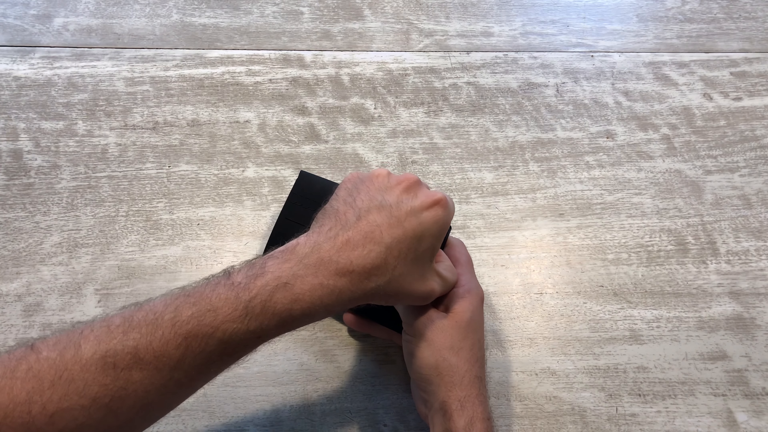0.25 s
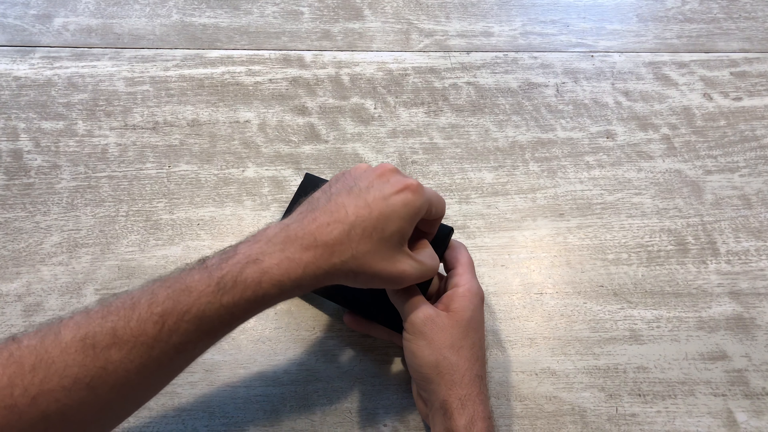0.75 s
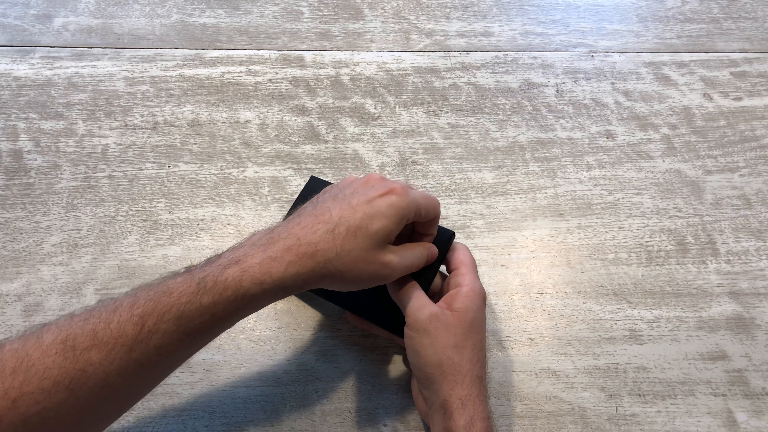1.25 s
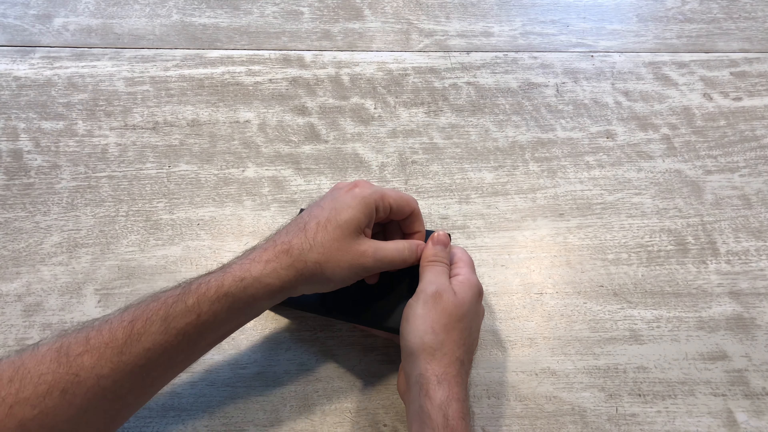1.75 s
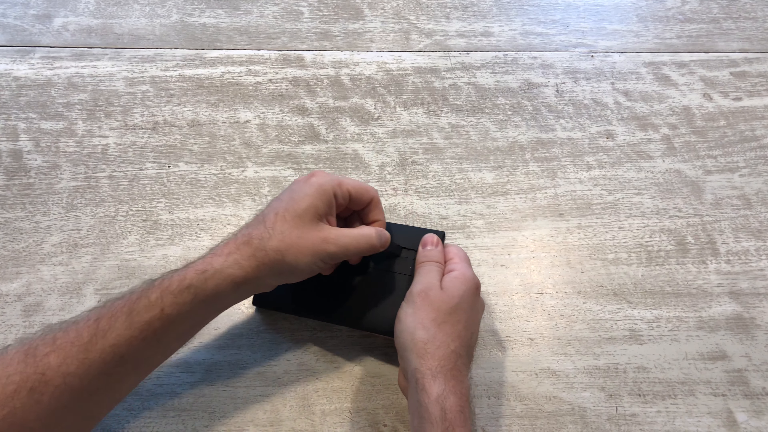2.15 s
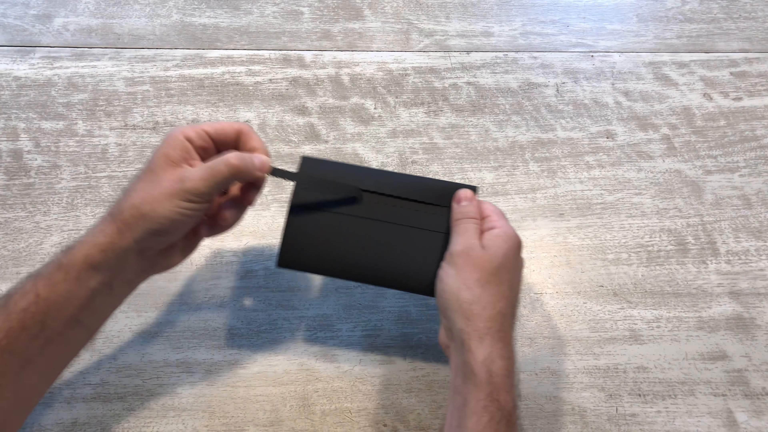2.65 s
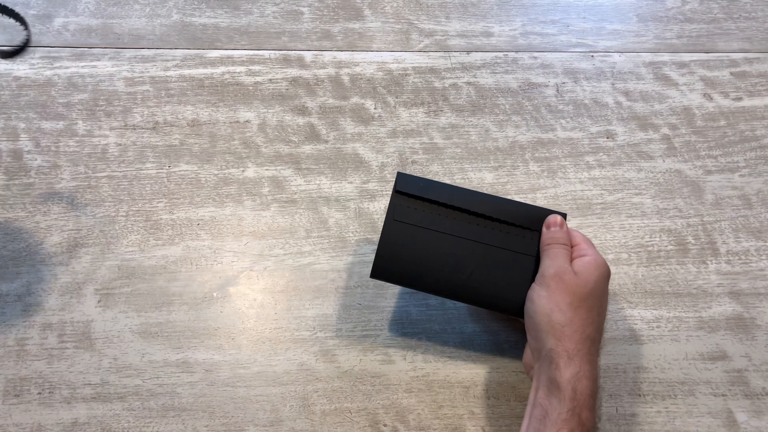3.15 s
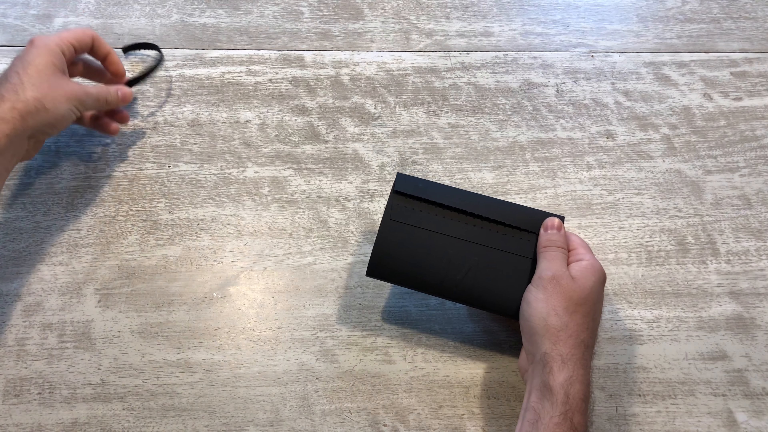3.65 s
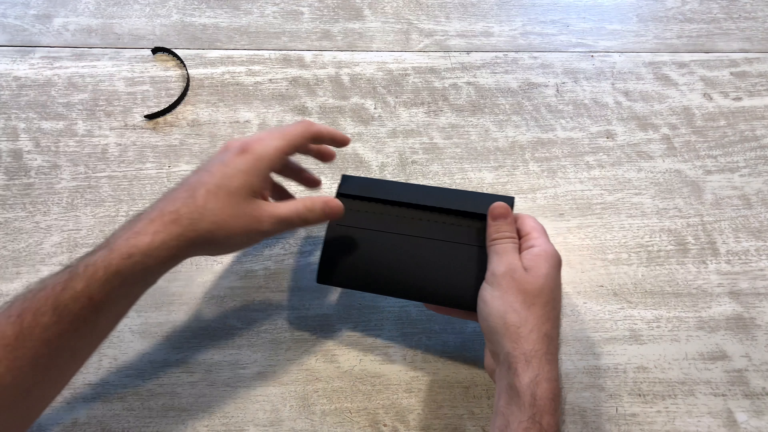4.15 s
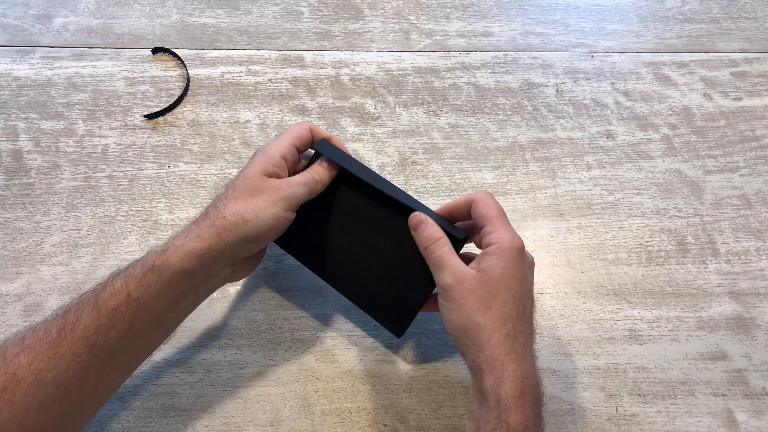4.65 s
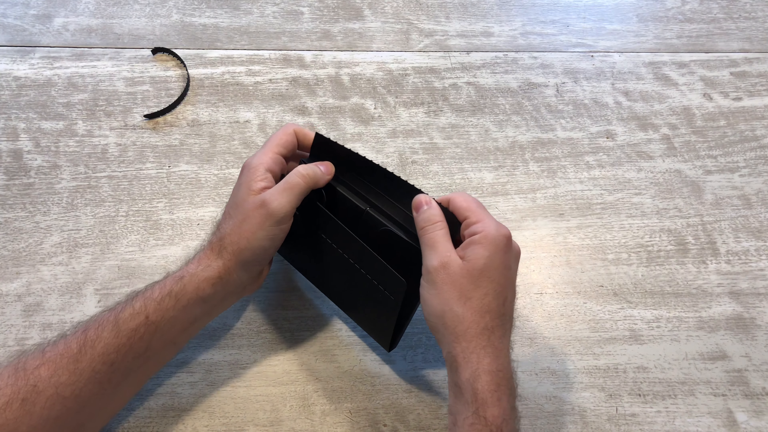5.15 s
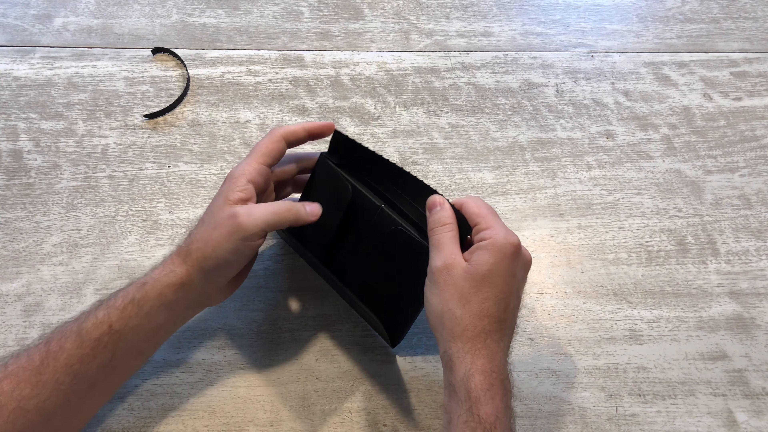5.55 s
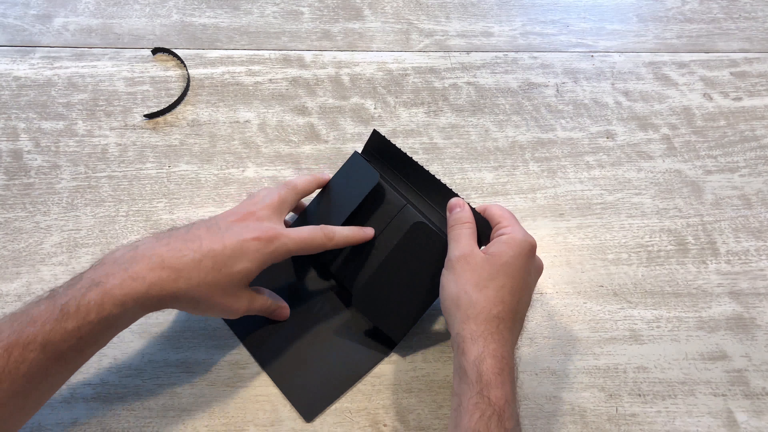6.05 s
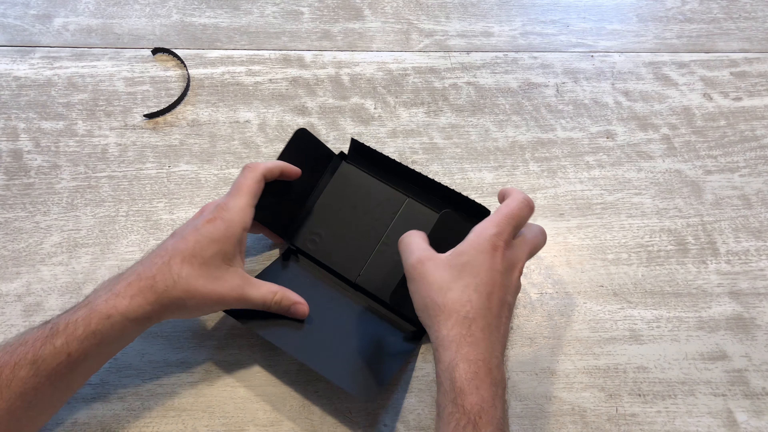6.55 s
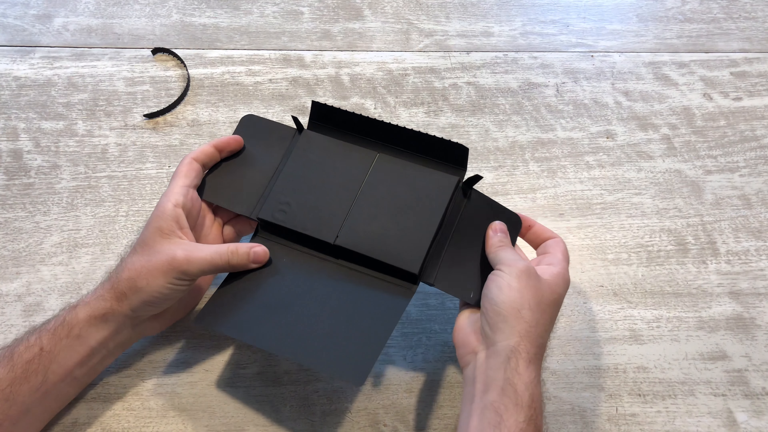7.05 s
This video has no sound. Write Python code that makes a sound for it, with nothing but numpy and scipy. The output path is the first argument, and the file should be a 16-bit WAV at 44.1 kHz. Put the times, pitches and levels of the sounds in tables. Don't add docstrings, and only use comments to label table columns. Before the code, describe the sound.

Close-up cardboard tearing: a few sharp snaps speed into a crackling rip, followed by quiet hand rustles, popping flaps and faint creaks indoors.

```python
import sys
import numpy as np
from scipy import signal
from scipy.fft import rfft, irfft
from scipy.io import wavfile
from scipy.ndimage import uniform_filter1d

SR = 44100
rng = np.random.default_rng(int(sys.argv[2]) if len(sys.argv) > 2 else 0)


def unload_wav(signal):
    wavfile.write(
        sys.argv[1],
        SR,
        np.round(np.clip(np.atleast_2d(signal).T, -1, 1) * 32767).astype(np.int16),
    )


def convert_level_to_amplitude(level_db):
    exponent = np.asarray(level_db, float) / 20
    return 10 ** exponent


N = 321577
EDGES = 22 * 2 ** np.arange(0, 9.7, .5)
TAILS = 3


def tugs():
    # (time [s], crack peak [dB], knock peak [dB], crack resonance [Hz], knock [Hz])
    bridges = [(0.7066, -25.5, -19.5, 9500, 850), (1.7574, -26, -16, 7400, 833),
               (1.7613, -29, -18, 13800, 1050), (2.1309, -27.5, -31, 10820, 770),
               (2.1376, -26, -19.5, 7220, 790), (2.1804, -21, -21.5, 5410, 760),
               (2.1873, -22.5, -20, 11120, 1150), (2.2412, -36, -27, 5190, 800),
               (2.3199, -23.5, -24, 5890, 815), (2.3309, -23, -22, 7130, 900),
               (2.3658, -25.5, -27, 5700, 830), (2.3704, -24.5, -17.5, 5167, 850),
               (2.3943, -18.5, -21.5, 6200, 860), (2.3978, -16, -17.5, 9200, 834),
               (2.4554, -25, -25, 6190, 765), (2.4581, -17, -20.5, 6670, 796),
               (2.5142, -25.5, -26, 9480, 890), (2.5165, -23, -20.5, 9360, 866),
               (2.5544, -17.5, -22, 9890, 980)]
    return snaps(varied(bridges, length_ms=0.86), grit_db=-0.5, peak_share=0.99, low_share=0.55,
                 cycles=7.6, swell=1.4, lead_db=-14.0, reach=10.5)


def rip():
    # (time [s], crack peak [dB], knock peak [dB], crack resonance [Hz], knock [Hz])
    tears = [(2.705, -17, -21, 10500, 810), (2.7333, -20.5, -16.5, 8600, 1270),
             (2.7529, -15, -16, 9900, 1230), (2.7705, -11, -17.5, 9900, 775),
             (2.7878, -15, -18.5, 5560, 1150), (2.8043, -12, -38, 8760, 1420),
             (2.8207, -14, -33.5, 6450, 2100), (2.8222, -14.5, -25.5, 3900, 644),
             (2.8399, -11, -25.5, 6140, 1610), (3.0157, -25, -33.5, 6200, 1150),
             (3.0241, -14, -22.5, 8180, 1330), (3.0409, -15.5, -45, 5040, 1450),
             (3.0426, -20.5, -19.5, 13200, 1510), (3.0531, -18.5, -18.5, 6300, 1260),
             (3.0585, -29, -21.5, 4800, 540), (3.0626, -31.5, -40, 3130, 760)]
    return snaps(varied(tears, length_ms=1.78), grit_db=1.0, peak_share=0.88, low_share=0.33,
                 cycles=12.0, swell=1.3, lead_db=-13.5, reach=12.0)


def ticks():
    # (time [s], crack peak [dB], knock peak [dB], crack resonance [Hz])
    grips = [(0.2447, -64, -61, 9800), (0.351, -56.5, -46.5, 7400), (0.6233, -72, -51.5, 4740),
             (0.6948, -59, -58, 6500), (0.8522, -55, -50, 2430), (0.9043, -59, -48, 5030),
             (0.9215, -55, -50, 11000), (0.9265, -57, -66, 11000), (1.3273, -75, -54, 2930),
             (1.4947, -55, -64, 9000), (1.5912, -48, -60, 6900), (1.6337, -58.5, -65, 11300),
             (1.7194, -64, -58, 7100), (2.6343, -43, -66, 2320), (2.6733, -49.5, -48, 6500),
             (4.3648, -49.5, -49, 4350), (4.3701, -44.5, -48.5, 8300), (4.4467, -50, -56, 5000),
             (4.4782, -56, -66, 1985), (4.6493, -49, -53, 5600), (4.6708, -39, -48, 7700),
             (4.6767, -41, -42, 9850), (4.6992, -46.5, -43.5, 5770), (4.8611, -60, -50, 6020),
             (4.9978, -59, -67.5, 5780)]
    # (time [s], crack peak [dB], knock peak [dB], crack resonance [Hz])
    strip = [(3.1869, -47, -39.5, 3120), (3.3669, -60, -62, 13530), (3.3997, -54, -66, 6490),
             (3.7316, -61, -49.5, 4960), (3.7995, -33, -43, 8800), (3.809, -43, -46, 8500),
             (3.8145, -51, -49, 7940), (3.827, -48, -51, 5480), (3.8813, -51, -69, 4950),
             (3.9255, -54, -56, 9000), (3.9305, -33, -50, 11200), (3.945, -51, -62, 15140),
             (4.2058, -62, -72, 6800), (3.502, -64.5, -70.5, 7720), (3.9912, -59.5, -62.5, 7240)]
    # (time [s], crack peak [dB], knock peak [dB], crack resonance [Hz], knock [Hz])
    flaps = [(4.2888, -62, -49, 2530, 1620), (4.299, -69, -54, 2480, 1045), (4.392, -57, -51.5, 2390, 1480),
             (4.55, -67, -57, 1980, 1300), (5.2431, -25, -38, 11500, 2030), (5.3665, -46, -42, 3930, 594),
             (5.3701, -35, -31.5, 4700, 1300), (5.4735, -33, -23.5, 6200, 1230),
             (5.477, -35.5, -26.5, 2760, 2140), (5.4807, -29, -28, 3580, 1320),
             (5.4915, -36, -34, 8200, 2100), (5.523, -50, -42.5, 6400, 580),
             (5.5418, -43.5, -38, 4300, 1120), (5.5524, -38, -63, 4040, 1300),
             (5.9212, -46.5, -42.5, 5000, 530), (5.9378, -51.5, -49, 2700, 600),
             (5.9633, -61, -51, 2300, 1080), (6.0123, -67, -50, 2390, 1270), (6.0682, -72, -53, 2520, 1130),
             (6.2413, -56, -48, 2980, 1400), (5.7514, -55, -43, 3010, 1930), (6.1327, -51, -46, 2900, 1760),
             (6.1468, -45.5, -53, 5020, 590), (6.2932, -59, -45, 3030, 1263),
             (6.3221, -50, -46, 5000, 3000), (6.3424, -52, -45, 5050, 2900), (6.3644, -55, -44, 2513, 1496),
             (6.385, -55, -51, 2960, 523), (6.574, -60, -66, 8500, 1060), (6.6528, -54, -55, 5730, 1364)]
    rows = varied(on_panel(grips, panel_hz=700), length_ms=1.3)
    rows += varied(on_panel(strip, panel_hz=1450), length_ms=3.03)
    rows += varied(flaps, length_ms=2.58)
    return snaps(rows, grit_db=10.0, peak_share=0.45, low_share=0.14,
                 cycles=11, swell=2.0, lead_db=-22.5, reach=2.2)


def creak():
    # (time [s], knock peak [dB], knock [Hz])
    creases = [(6.9094, -47.5, 1056), (6.992, -53, 1013), (7.0241, -40, 1692), (7.0353, -56, 825),
               (7.056, -49, 854), (7.083, -46.5, 932), (7.1045, -45, 1057), (7.135, -46.5, 840),
               (7.1663, -47.5, 930), (7.185, -61, 910), (7.2015, -52.5, 990), (7.208, -44, 780),
               (7.24, -56.5, 970), (7.262, -59, 675)]
    crack_db, crack_hz = -13, 3300
    rows = varied([(s, db + crack_db, db, crack_hz, hz) for s, db, hz in creases], length_ms=1.36)
    slips = snaps(rows, grit_db=0.0, peak_share=0.6, low_share=0.13,
                  cycles=9.2, swell=1.3, lead_db=-21.0, reach=2.0)
    slips[1:] = slips[1:] * convert_level_to_amplitude(-2)
    return slips


def pats():
    # (time [s], knock peak [dB], knock [Hz])
    touches = [(.029, -61, 740), (.391, -61, 520), (.576, -59, 520), (1.09, -57, 606), (1.253, -58, 700),
               (1.38, -59, 950), (1.406, -62, 850), (1.472, -57, 560), (1.563, -57, 1230),
               (1.702, -59, 773), (3.732, -56, 700), (3.8, -48, 650), (4.289, -52, 650), (4.304, -54, 700),
               (4.39, -47, 800), (4.417, -54, 2300), (4.43, -53, 2200), (4.452, -48, 1100),
               (4.476, -48, 800), (4.527, -55, 1340), (4.551, -49, 700), (4.574, -51, 660),
               (4.596, -53, 650), (4.652, -47, 2300), (4.744, -52, 560), (4.821, -50, 1080),
               (4.954, -57, 1100), (5.963, -49, 500), (6.19, -55, 1330), (6.243, -50, 480),
               (6.302, -49, 2900), (6.328, -47, 2150), (6.397, -51, 1350), (6.456, -54, 1000),
               (6.466, -52, 2700), (6.539, -57, 713)]
    crack_db, crack_hz, knock_gain_db = -18, 2200, 3.5
    rows = varied([(s, db + crack_db, db + knock_gain_db, crack_hz, hz) for s, db, hz in touches], length_ms=1.2)
    return snaps(rows, grit_db=4.0, peak_share=0.4, low_share=0.1,
                 cycles=6.5, swell=1.5, lead_db=-24.0, reach=2.5)


def snaps(rows, grit_db, peak_share, low_share, cycles, swell, lead_db, reach):
    # (frequency [Hz], level [dB], t60 [s])
    box = [(348, -8.5, 0.012), (443, 2, 0.03), (760, -2, 0.025), (1180, -5, 0.023), (1300, 7, 0.01),
           (1700, -16, 0.025), (2100, -13.5, 0.0094)]
    size, lead = 1024, 110
    out = np.zeros((1 + TAILS, N + size))
    t_ms = (np.arange(size) - lead) / SR * 1000
    click = 1. * (np.arange(size) == lead)
    body = peak_one(sum(convert_level_to_amplitude(level_db) * ring(click, hz, t60) for hz, level_db, t60 in box))
    stretch = convert_level_to_amplitude(lead_db) * np.exp(-np.abs(t_ms) / .7)
    for k, (s, db, knock_db, hz, length_ms, knock_hz) in enumerate(rows):
        noise, lumps = rng.standard_normal((2, size))
        phase = np.maximum(t_ms, 0) / np.clip(length_ms, .9, 3.6)
        burst = phase * np.exp(-3 * phase ** 2) + stretch
        grit = convert_level_to_amplitude(grit_db * rms_one(uniform_filter1d(lumps, size=9)))
        fibres = evened(burst * noise * grit) * np.clip(1 + t_ms / 1.2, convert_level_to_amplitude(lead_db), 1)

        low_hz = 900 + low_share * hz
        high_hz = low_hz + reach * hz ** 2 / 5000
        crack = peak_one(broad(fibres, low_hz, high_hz)) + peak_share * peak_one(ring(fibres, hz, 12 / hz))
        crack = convert_level_to_amplitude(db + 6.5) * peak_one(crack)

        panel = peak_one(ring(ring(click, knock_hz, swell / knock_hz), knock_hz, cycles / knock_hz))
        panel = broad(panel + .2 * body, .55 * knock_hz, 2.4 * knock_hz)
        delay = round(0.51 * length_ms * SR / 1000)
        knock = convert_level_to_amplitude(knock_db - 2.5) * peak_one(np.roll(panel, delay))

        even = pooled(rms_one(broad(click, low_hz, high_hz)), .45 * rms_one(ring(click, hz, 6 / hz)))
        hollow = pooled(rms_one(ring(click, knock_hz, 2.6 / knock_hz)), 0.92 * rms_one(body))
        hollow = broad(np.roll(hollow, size // 2), .55 * knock_hz, 3 * knock_hz)
        around = pooled(np.std(crack) * rms_one(even), np.std(knock) * rms_one(hollow))
        i = round(s * SR) + 12 - lead
        out[0, i:i + size] += crack + knock
        out[1 + k % TAILS, i:i + size] += np.roll(around, lead)
    return out[:, :N]


def varied(rows, length_ms):
    chance = rng.uniform(-1, 1, len(rows))
    return [(s, db, knock_db, hz, length_ms * (1 + .2 * c), knock_hz)
            for (s, db, knock_db, hz, knock_hz), c in zip(rows, chance)]


def on_panel(rows, panel_hz):
    chance = rng.uniform(-1, 1, len(rows))
    return [(*row, panel_hz * (1 + .1 * c)) for row, c in zip(rows, chance)]


def overtones():
    # (time [s], peak [dB], frequency [Hz])
    answers = [(0.7074, -25.5, 2200), (0.7064, -30, 3570), (0.7063, -26, 5600), (1.7572, -26.5, 2080),
               (1.7576, -28, 3320), (1.7563, -31, 4870), (1.7609, -26, 3040), (1.7618, -28, 4000),
               (1.7614, -25.5, 5600), (1.762, -27, 1600), (2.133, -37.5, 5940), (2.136, -25.5, 2040),
               (2.138, -26, 3130), (2.181, -31, 2900), (2.1878, -26, 3400), (2.2409, -34, 2900),
               (2.319, -32, 3100), (2.3301, -26, 3340), (2.367, -43.5, 3500), (2.3704, -20.5, 3100),
               (2.3944, -27, 3050), (2.398, -27, 2300), (2.5145, -29, 2700), (2.5165, -24, 5550),
               (2.5527, -20, 5640), (2.5546, -23, 14400), (2.7043, -22.5, 2420), (2.7037, -28.5, 5540),
               (2.733, -24, 2650), (2.7332, -21.5, 4960), (2.755, -22, 2500), (2.7544, -30.5, 5300),
               (2.7708, -22, 2900), (2.7705, -25.5, 5400), (2.788, -19.5, 8200), (2.8062, -23, 6000),
               (2.823, -9, 11800), (2.8402, -20, 9320), (2.8399, -24, 2850), (3.0238, -22.5, 5740),
               (3.0426, -23, 2900), (3.0545, -27, 2600), (2.3711, -24.5, 1540), (2.399, -31, 1570),
               (2.458, -31.5, 1480), (2.556, -31, 1350), (2.516, -30, 1600), (2.772, -32, 1570),
               (5.2444, -39, 2030), (5.2427, -25, 6100), (5.2427, -32, 7300), (5.553, -42, 4000),
               (3.802, -38.5, 2800), (3.93, -42, 8500), (5.9213, -47.5, 1190), (7.025, -58, 3300),
               (7.084, -49, 4900), (7.1055, -50.5, 1600), (7.2095, -54.5, 1750), (7.21, -58, 3200)]
    size, cycles = 512, 8.9
    out, click = np.zeros((1 + TAILS, N)), 1. * (np.arange(size) == 0)
    for k, (s, db, hz) in enumerate(answers):
        tone = convert_level_to_amplitude(db) * peak_one(ring(ring(click, hz, cycles / hz), hz, cycles / hz))
        around = np.std(tone) * rms_one(broad(click, .6 * hz, 1.6 * hz))
        i = round(s * SR) + 12
        out[0, i:i + size] += tone
        out[1 + k % TAILS, i:i + size] += around
    return out


def slides():
    # (frequency [Hz], level [dB per Hz])
    hiss_colour = [(900, -9), (2000, -3), (4000, -4.5), (7000, -3), (11000, -7.5), (16000, -11)]
    # (time [s], frequency [Hz])
    opening = [(0, 730), (3.602, 760), (3.899, 1224), (4.2, 800.6), (5.299, 1100), (7.29, 1014)]
    hiss_gain, rumble_gain, centre_hz = strokes()
    panel_hz = np.interp(np.arange(N) / SR, *np.transpose(opening))
    sizes = convert_level_to_amplitude(3 * np.minimum(rng.exponential(1, (2, N)), 5)) * np.sign(rng.random((2, N)) - .5)
    chance = rng.random((2, N))
    catches = sizes * (chance < 12000 / SR) * convert_level_to_amplitude(2.4 * drift(45))
    third_octaves = 800 * 2 ** np.arange(0, 4.7, 1 / 3)
    hiss = coloured(catches, hiss_colour, third_octaves, patchy_db=2.5, rate=7)
    hiss = hiss + convert_level_to_amplitude(-13.5) * wandering(catches, centre_hz, 800)
    lumps = sizes * (chance < 1500 / SR) * convert_level_to_amplitude(3 * drift(30))
    rumble = rms_one(band(lumps[0], 200, 1200)) + 0.15 * wandering(lumps, panel_hz, 150)
    return hiss_gain * hiss + rumble_gain * convert_level_to_amplitude(2.5) * rms_one(rumble)


def strokes():
    # (start [s], length [s], hiss [dB], box rumble [dB], hiss resonance [Hz])
    easing = [(0.0, 0.05, -80, -71.5, 4300), (0.24, 0.17, -79, -82, 4700), (0.603, 0.1, -86, -77.5, 4400),
              (1.908, 0.45, -67.5, -71, 4000), (3.411, 0.095, -76.5, -77, 4900),
              (3.899, 0.14, -73, -69, 6500), (4.075, 0.34, -77.5, -77.5, 4000),
              (4.376, 0.25, -60, -71, 5400), (4.627, 0.1, -56.5, -79, 5640),
              (4.669, 0.021, -50.5, -54, 7060), (4.878, 0.165, -67.5, -74, 4700),
              (6.257, 0.039, -67.5, -73, 3995), (5.488, .13, -58.5, -60, 4000),
              (5.205, .035, -74, -78, 4000), (5.58, .1, -58, -71.5, 6500), (5.682, 0.12, -55, -67.5, 5300),
              (5.8, 0.058, -61, -67, 3500), (5.9, 0.23, -67, -75, 4600), (6.296, 0.08, -58, -63, 4800),
              (5.045, .07, -75, -78, 4500), (6.406, 0.37, -65, -72.5, 3800),
              (6.703, 0.21, -61, -72.5, 5680), (6.918, 0.35, -67, -80, 3100)]
    # (end [s], length [s], hiss [dB], box rumble [dB], hiss resonance [Hz])
    pressing = [(4.864, .2, -59.5, -63.5, 3800), (1.4, 0.32, -74, -78, 5300),
                (1.58, 0.17, -69.5, -74, 6400), (1.759, 0.2, -69.5, -67.5, 5450),
                (3.885, 0.15, -78, -64.5, 7000), (5.202, 0.091, -60.5, -68, 4950),
                (6.259, 0.16, -59.5, -66, 4555)]
    land_s, lift_s, ease_db_per_s, press_db = .01, 0.024, 17, 13.5
    t = np.arange(N) / SR
    touches = [(s, s + length, -ease_db_per_s * (t - s), *rest) for s, length, *rest in easing]
    touches += [(s - length, s, press_db * np.minimum(t - s, 0) / length, *rest)
                for s, length, *rest in pressing]
    hiss, rumble, centre = np.full((3, N), 1e-12)
    for start, end, trend_db, hiss_db, rumble_db, hz in touches:
        held = np.interp(t, [start - land_s, start, end, end + lift_s], [0, 1, 1, 0])
        shape = held ** 2 * convert_level_to_amplitude(2 * np.minimum(trend_db, 0))
        hiss = hiss + shape * convert_level_to_amplitude(2 * hiss_db)
        rumble = rumble + shape * convert_level_to_amplitude(2 * rumble_db)
        centre = centre + shape * convert_level_to_amplitude(2 * hiss_db) * hz
    return np.sqrt(hiss), np.sqrt(rumble), centre / hiss


def rubs():
    # (start [s], length [s], level [dB], frequency [Hz], width [Hz])
    strokes_of_edge = [(1.32, 0.03, -68.5, 5470, 5000), (4.048, 0.24, -86.5, 4540, 497),
                       (4.408, 0.14, -66.5, 5900, 900), (4.363, 0.027, -59, 1505, 1500),
                       (4.6, 0.11, -65, 5120, 902), (4.678, 0.052, -63, 890, 714),
                       (5.52, .015, -56, 6570, 2000), (6.306, .05, -60, 2900, 800),
                       (6.45, 0.032, -65, 2750, 800), (3.796, 0.081, -60, 1420, 610),
                       (3.722, 0.036, -68.5, 1385, 900), (4.74, 0.125, -67, 3660, 1100),
                       (4.811, 0.047, -58.5, 1200, 500), (4.915, 0.08, -69, 4800, 450),
                       (5.586, 0.22, -62, 1190, 348), (5.653, 0.13, -60, 2100, 795),
                       (5.804, 0.046, -56, 1140, 450), (7.125, .045, -72.5, 3010, 500),
                       (5.729, .05, -64, 3010, 398), (6.695, .19, -63.5, 5700, 2020)]
    edge_s, out = .018, 0
    t = np.arange(N) / SR
    white = rng.standard_normal(N) * convert_level_to_amplitude(3.0 * drift(33))
    for s, length, db, hz, width_hz in strokes_of_edge:
        corners = [s - edge_s / 2, s + edge_s, s + length - edge_s, s + length + 2 * edge_s]
        held = np.interp(t, corners, [0, 1, 1, 0])
        grain = rms_one(band(white, hz - width_hz / 3, hz + width_hz / 3, order=1))
        out = out + convert_level_to_amplitude(db) * held * grain
    return out


def bumps():
    # (time [s], peak [dB], frequency [Hz])
    pushes = [(2.187, -45, 160), (2.333, -46, 160), (2.4, -54, 177.7), (2.559, -46, 207), (5.376, -43, 332),
              (3.056, -36.5, 230), (4.671, -52.5, 155), (5.372, -48, 132), (5.475, -46, 196),
              (5.921, -57, 167), (2.373, -33.5, 304), (2.46, -46.5, 296), (2.517, -39, 310.5),
              (2.704, -47, 198.3), (2.769, -35.5, 274.4), (2.819, -47.5, 180.4), (5.544, -47, 307),
              (3.799, -59, 552), (3.931, -65, 495), (2.19, -44, 300), (2.736, -42, 310), (6.332, -54, 330)]
    out = np.zeros(N)
    for s, db, hz in pushes:
        push = np.hanning(round(SR / hz / 2))
        thud = band(ring(np.pad(push, (0, 6000)), hz, 9.2 / hz), 69, 1800)
        out[round(s * SR):][:len(thud)] += convert_level_to_amplitude(db) * peak_one(thud)
    return out


def rings():
    # (time [s], level [dB], frequency [Hz], width [Hz], t60 [s])
    springs = [
        (3.802, -62, 7800, 1200., 0.6),
        (5.2445, -63, 5700, 500., 0.3),
        (5.2445, -65, 2030, 60., 0.5),
    ]
    out, t = np.zeros(N), np.arange(SR // 3) / SR
    for s, db, hz, width_hz, t60 in springs:
        tone = rms_one(band(rng.standard_normal(len(t)), hz - width_hz / 2, hz + width_hz / 2))
        purity = 160 / width_hz
        tone = tone + purity * np.clip(purity, 0, 1) * np.sin(2 * np.pi * hz * t)
        out[round(s * SR):][:len(t)] += convert_level_to_amplitude(db - 60 * t / t60) * tone
    return out


def squeak():
    # (time [s], frequency [Hz], level [dB])
    glide = [(3.26, 11600, -92), (3.3, 11450, -87), (3.37, 10800, -90), (3.455, 10500, -86),
             (3.48, 10050, -90)]
    s, hz, db = np.transpose(glide)
    t = np.arange(N) / SR
    whistle = wandering(rng.standard_normal((2, N)), np.interp(t, s, hz), 40)
    return convert_level_to_amplitude(np.interp(t, s, db, left=-200, right=-200)) * whistle


def room(direct, paths):
    # (delay [s], level [dB])
    reflections = [
        (0.0114, -15),
        (0.0169, -15.5),
    ]
    echoes = sum(convert_level_to_amplitude(db) * np.roll(direct, round(s * SR)) for s, db in reflections)
    tails = sum(signal.fftconvolve(path, room_tail())[:N] for path in paths)
    return tails + band(echoes, 210, 6000, order=1)


def room_tail():
    # (frequency [Hz], t60 [s])
    decay = [(150, 0.57), (500, 0.44), (1400, 0.5), (3700, 0.55), (9000, 0.33), (15000, 0.32)]
    # (frequency [Hz], level [dB])
    tail_colour = [(150, 8), (400, 9.5), (800, 11.5), (1400, 7.5), (2300, 6.5), (4200, 4.5), (5800, 5),
                   (9000, 6), (15000, -1)]
    room_db, room_start_s = -12, .008
    near_db, near_t60_s = -14, .03
    t = np.arange(round(.9 * SR)) / SR
    white, tail = rng.standard_normal((3, len(t))), 0
    for k, (low, high) in enumerate(zip(EDGES[4:], EDGES[5:])):
        hz = np.sqrt(low * high)
        fall = convert_level_to_amplitude(at_hz(tail_colour, hz) - 60 * t / at_hz(decay, hz))
        tail = tail + fall * band(white[k % 2], low, high)
    tail = tail * np.clip((t - room_start_s) / .006, 0, 1)
    near = white[2] * convert_level_to_amplitude(-60 * t / near_t60_s) * np.clip(t / 0.0054, 0, 1)
    return (convert_level_to_amplitude(room_db) * rms_one(tail) + convert_level_to_amplitude(near_db) * rms_one(near)) / np.sqrt(len(t))


def air():
    # (frequency [Hz], level [dB per Hz])
    air_colour = [(12, -38), (20, -27), (48, -21.5), (121, 1.5), (289, -3.5), (551, -8), (2510, -23),
                  (4660, -24), (13200, -29), (15200, -35), (16500, -43)]
    # (frequency [Hz], width [Hz], level [dB])
    machines = [(57, 18, -76.5), (111, 44, -75), (160, 8.2, -84)]
    white = rng.standard_normal((3, N))
    hum = sum(convert_level_to_amplitude(db + 1.2 * drift(3.0)) * rms_one(band(white[2], hz - width / 2, hz + width / 2))
              for hz, width, db in machines)
    return convert_level_to_amplitude(-70) * coloured(white, air_colour, EDGES, patchy_db=1.9, rate=4.2) + hum


def rms_one(x):
    return x / np.sqrt(np.mean(x ** 2) + 1e-20)


def peak_one(x):
    return x / (np.abs(x).max() + 1e-20)


def at_hz(points, hz):
    table_hz, values = np.transpose(points)
    return np.interp(np.log(hz), np.log(table_hz), values)


def band(x, low, high, order=2):
    return signal.sosfilt(signal.butter(order, [low, min(high, .47 * SR)], "band", fs=SR, output="sos"), x)


def broad(x, low, high):
    return signal.lfilter(*signal.butter(2, [low, min(high, .47 * SR)], "band", fs=SR), x)


def ring(x, hz, t60):
    r, w = convert_level_to_amplitude(-60 / (t60 * SR)), 2 * np.pi * hz / SR
    return signal.lfilter([0, np.sin(w)], [1, -2 * r * np.cos(w), r * r], x + 1e-18)


def drift(rate):
    r = np.exp(-80 * np.pi * rate / SR)
    slow = signal.lfilter([1], [1, -2 * r, r * r], rng.standard_normal(N // 40 + 2002))[2000:]
    return np.interp(np.arange(N) / 40, np.arange(len(slow)), rms_one(slow))


def coloured(white, spectrum, edges, patchy_db, rate):
    out = 0
    for k, (low, high) in enumerate(zip(edges, edges[1:])):
        gain_db = at_hz(spectrum, np.sqrt(low * high)) + patchy_db * drift(rate)
        out = out + convert_level_to_amplitude(gain_db) * band(white[k % 2], low, high)
    return rms_one(out)


def wandering(pair, centre_hz, half_width_hz):
    swell = signal.sosfilt(signal.butter(2, half_width_hz, fs=SR, output="sos"), pair)
    turn = 2 * np.pi * np.cumsum(centre_hz) / SR
    return rms_one(swell[0] * np.cos(turn) + swell[1] * np.sin(turn))


def evened(x):
    spectrum = rfft(x)
    return irfft(spectrum / np.sqrt(uniform_filter1d(np.abs(spectrum) ** 2, size=24) + 1e-20), len(x))


def pooled(*parts):
    power = sum(np.abs(rfft(part)) ** 2 for part in parts)
    return irfft(np.sqrt(power), len(parts[0]))


def scene():
    card = tugs() + rip() + ticks() + creak() + pats()
    corner = overtones()
    card = np.vstack([card[:1] + corner[:1], card[1:], corner[1:]])
    no_bass = signal.butter(4, 390, "high", fs=SR, output="sos")
    direct, *paths = signal.sosfilt(no_bass, card)
    rub, bump = slides() + rubs(), bumps()
    paths[-1] = paths[-1] + 1.47 * bump + rub / 2
    near = direct + bump + rub + rings() + squeak()
    return (near + room(direct + bump, paths) + air())[None]


def band_limit(x):
    return signal.sosfilt(signal.butter(12, 17160, fs=SR, output="sos"), x)


def record(dry):
    cutoff_hz = 16800
    step = signal.cheby2(8, 16, cutoff_hz - 750, fs=SR, output="sos")
    wall = signal.cheby2(10, 60, cutoff_hz + 500, fs=SR, output="sos")
    mix = signal.sosfilt(np.vstack([step, wall]), dry)
    return band_limit(mix)


dry = scene()
out = record(dry)
unload_wav(out)
```